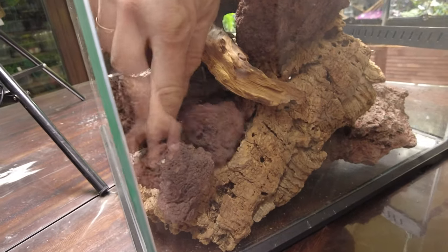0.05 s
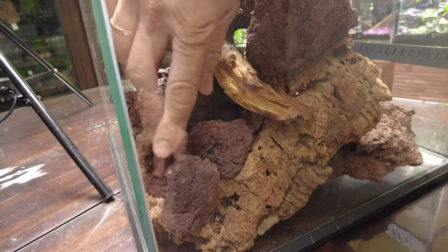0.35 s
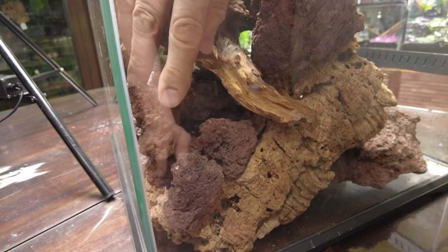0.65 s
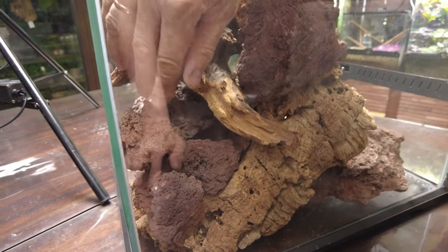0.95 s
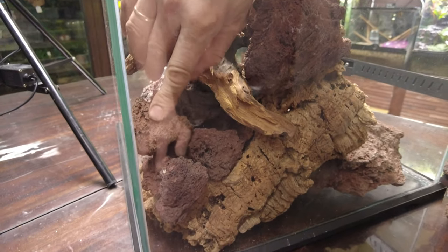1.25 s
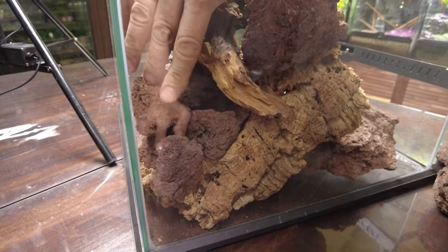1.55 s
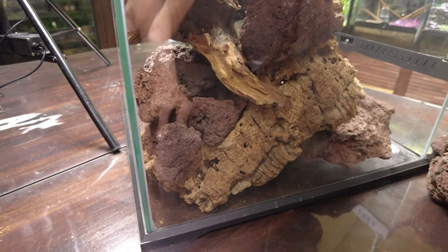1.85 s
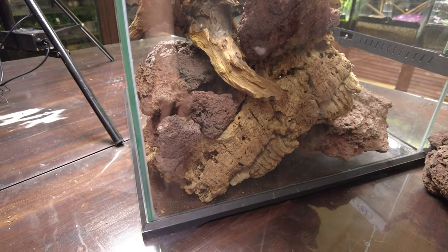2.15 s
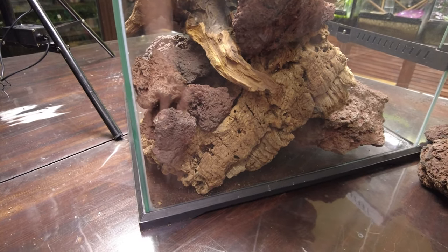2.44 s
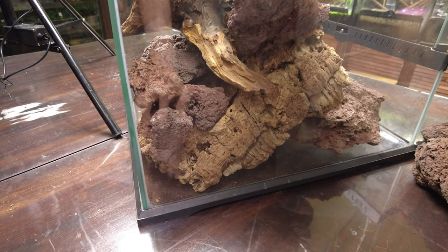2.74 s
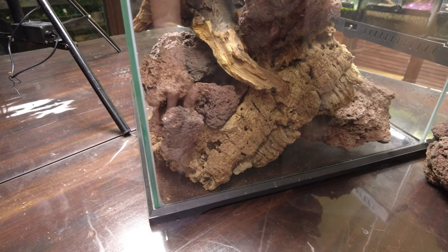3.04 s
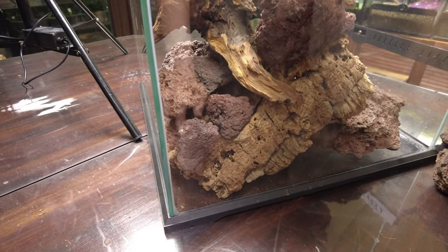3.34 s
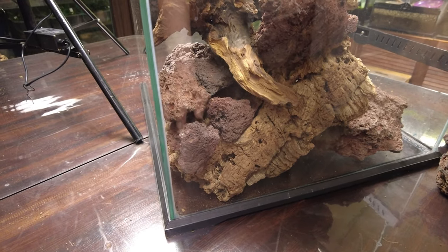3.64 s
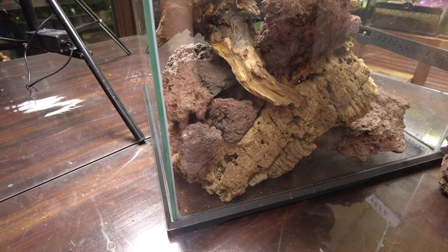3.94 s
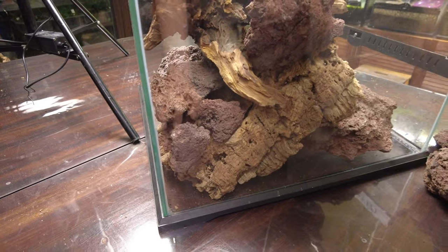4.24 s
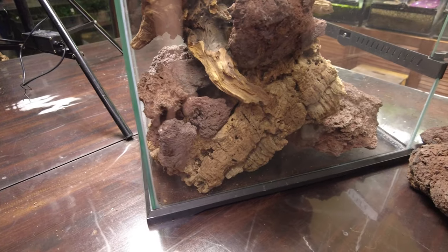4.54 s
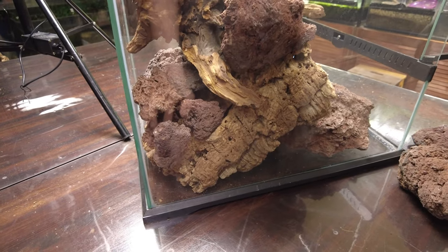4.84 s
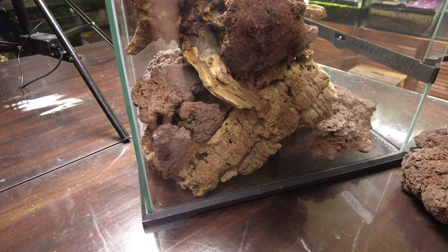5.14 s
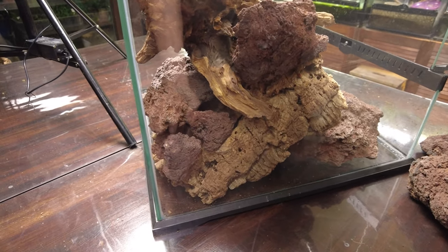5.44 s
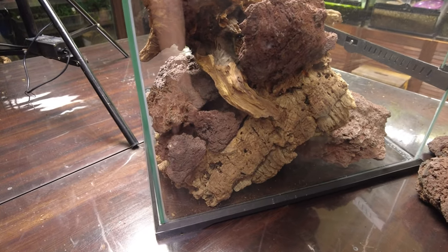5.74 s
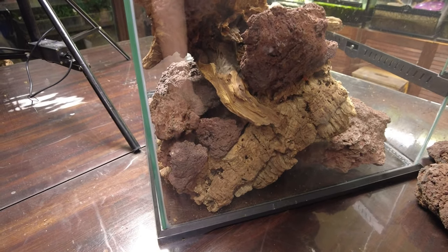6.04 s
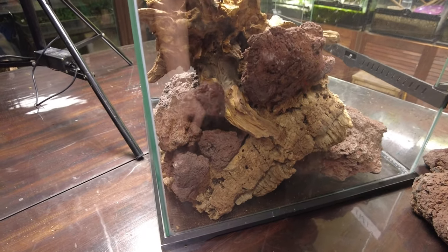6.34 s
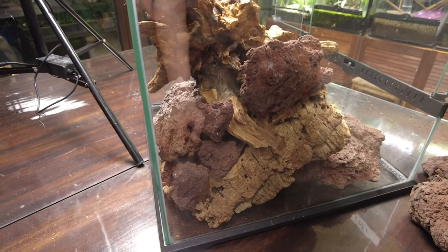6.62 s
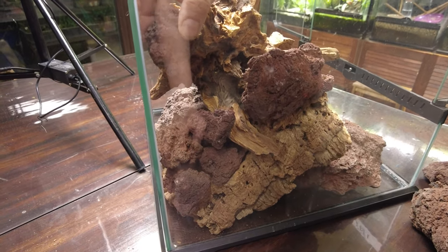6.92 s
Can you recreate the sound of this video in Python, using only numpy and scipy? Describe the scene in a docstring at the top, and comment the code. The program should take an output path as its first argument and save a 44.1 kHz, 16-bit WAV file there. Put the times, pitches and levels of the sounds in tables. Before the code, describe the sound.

Close knocks of porous stone ring a glass tank, followed by a catching scrape of bark, ticking crumbs and a short rock clatter.

```python
"""A small room, close to a glass tank in which a hand wedges lava rocks and cork bark.
Rocks knock and drag against each other and ring the panes; skin rubs over their pores.
A slab of bark scrapes and catches its way down, crumbs tick, the pile shifts,
and one rock drops into place with a clatter. A low hum lies under it all."""
import sys
import numpy as np
from scipy import signal
from scipy.fft import rfft, irfft, next_fast_len
from scipy.io import wavfile

SR = 44100
rng = np.random.default_rng(int(sys.argv[2]) if len(sys.argv) > 2 else 0)


def file_out(sig):
    """Save sig as 16-bit WAV at sys.argv[1]."""
    # one column per channel
    cols = np.atleast_2d(sig).T
    # limit, then scale
    lim = np.clip(cols, -1, 1)
    pcm = np.round(lim * 32767).astype(np.int16)
    wavfile.write(sys.argv[1], SR, pcm)


N = 307818
T = np.arange(int(SR * .35)) / SR  # time axis of one ring, in seconds

# Modes of the loaded glass tank. Each row: pitch in Hz, level in dB, t60 in seconds.
TANK_MODES = [(178.5, -16.5, 0.35), (210.6, -6, 0.43), (384.1, -10, 0.34), (450, -4.5, 0.18),
              (513.7, 1, 0.091), (585, -1.5, 0.22), (690.6, 2, 0.21), (762, -2.5, 0.2), (919, -2.5, 0.22),
              (1115, -5.5, 0.19), (1239, -3, 0.16), (1380, -1, 0.11), (1575, -4.5, 0.13), (1660, 3.5, 0.14),
              (1833, -3, 0.13), (1780, -8.5, 0.14), (2160, -14.5, 0.14), (2307, -1, 0.1),
              (2580, -9.5, 0.044), (2560, -16, 0.13), (3089, -8, 0.1)]
# Dense, short ring of the porous rocks and the table. Each row: frequency in Hz, level in dB.
STONE_COLOUR = [(50, -15.5), (85, 6), (125, -9.5), (180, 6.5), (260, -4), (480, 2.5), (820, 1.5),
                (1350, -2), (2000, -6), (2700, -8), (3800, -9), (5000, -25), (8500, -28.5), (12000, -39),
                (16000, -37)]


def knocks():
    """Each blow cracks in the stone, rings the panes and the loose rock, then sets the table booming."""
    # Rock strikes rock or glass. Each row: time in seconds, strength in dB, hardness in Hz,
    # extra thud on the table in dB, share that goes into the panes from 0 to 1.
    blows = [(0.038, -26, 3760, -4, 0.95), (0.067, -30.5, 5000, -0.5, 0.8), (0.1, -34, 6350, 6.5, 1),
             (0.133, -26, 3390, -10, 0.44), (0.224, -43, 1460, 4.5, 0.7), (0.312, -35.5, 1480, -6, 1),
             (0.379, -23.5, 2350, -10, 0.67), (0.482, -41.5, 1600, -8, .6), (0.533, -34.5, 1760, -21, 0.67),
             (0.627, -33, 3160, -17, 0.66), (0.751, -32, 1600, -3, 1), (0.779, -37, 3040, 7, 0.44),
             (0.859, -23.5, 3930, -0.5, .95), (0.899, -25.5, 3800, -1.5, 0.88),
             (1.207, -45.5, 1900, 3, 0.58), (1.476, -30, 1380, -1.5, 0.94), (1.577, -28, 750, -5, .7),
             (1.603, -22.5, 520, -5.5, 0.5), (1.681, -31, 3300, 3, 0.56), (1.805, -41.5, 606, 4, 0.22),
             (1.84, -50, 2840, 5.5, 0.42), (5.632, -49.5, 402, 11.5, 0.19), (5.652, -42.5, 231, 3.5, 0.53),
             (5.85, -49, 250, 6.5, 0.43), (6.035, -29, 242, -3, 0.26), (6.078, -60, 1200, 7, 0.7),
             (6.249, -30.5, 420, 0, 0.8), (6.307, -26, 4000, -5, 0.14), (6.369, -24, 2400, -2, 0.41),
             (6.377, -29, 1800, -3.5, 0.3), (6.385, -26, 4700, -2.5, 0.44), (6.402, -34, 900, 8.5, 0.24),
             (6.473, -30.5, 3660, 3.5, 0.26)]
    # Modes of the loose rock resting on bark. Each row: pitch in Hz, level in dB, t60 in seconds.
    rock_modes = [(176.6, -3.5, 0.22), (305.6, -3, 0.089), (700, -9, 0.031), (886, -1, 0.15),
                  (1120, -25.5, 0.16), (1260.5, 10, 0.079), (1410, -1, .15), (1704, -6.5, .1),
                  (2090, -9, 0.068), (2550, -14, 0.083), (2670, -12, 0.15), (5600, -22, 0.14),
                  (6430, -20.5, .05), (7500, -24, .07), (8100, -11.5, 0.069), (11100, -24, 0.037)]
    # Colour of snapping grit. Each row: frequency in Hz, level in dB.
    grit_colour = [(2000, -0.5), (9000, 1.5), (13000, -3.5), (16000, -3)]
    # Thud, knock, body, clack and grit of a perfectly hard blow, in dB.
    balance_db = [0, -1.5, 2, -3.5, 1.5]
    boom_colour = [(40, -31), (80, 3), (125, -6), (180, 2.5), (300, -14.5), (600, -66.5)]
    out = np.zeros((2, N))
    for s, db, hardness_hz, thud_db, glass in blows:
        stone = burst(STONE_COLOUR, t60=0.066, tail_db=-13, tail_t60=0.22)
        wobble = roughness(len(T), rate=600, spread=1.5, slip_t60=0.0079) * fade(0.55)
        stone = level(stone * np.hypot(1, wobble), -0.66, span=0.036)
        boom = burst(boom_colour, t60=0.13, tail_db=-0.5, tail_t60=0.45) * (1 - fade(0.041))
        panes = glass * undb(4) * ring(TANK_MODES, detune=0.0015)
        loose_rock = (1 - glass) * undb(1) * ring(rock_modes, detune=0.011)
        grit = colour(rng.standard_normal((2, len(T))), grit_colour) * fade(0.028)
        blow = stone + panes + loose_rock + undb(-9.5) * boom + undb(-11.5) * grit
        # Porous points give way one after another; a softer contact crushes for longer.
        crush_s = 0.0064 * (2000 / hardness_hz) ** 0.27
        attack = np.minimum(T / crush_s, 1) ** 1.1
        shares_db = db + np.add(balance_db, [thud_db, 0, 0, 0, 0])
        add(out, s - .002, contact(blow * attack, shares_db, hardness_hz, span=0.022))
    return out


def drags():
    """Rough rock hops over rough rock: a quick train of slips excites the stone and the panes."""
    # Each row: start and end in seconds, strength in dB, hardness in Hz.
    slides = [(0, 0.016, -32.5, 3050), (0.05, 0.109, -30, 2010), (0.141, 0.178, -33.5, 1688),
              (0.344, 0.379, -35.5, 1740), (0.47, 0.518, -39.5, 1506), (0.55, 0.605, -42, 1450),
              (0.633, 0.66, -31, 2440), (0.688, 0.75, -36.5, 1470), (0.725, 0.838, -38, 2270),
              (1.239, 1.377, -52.5, 3000), (1.346, 1.388, -38, 1580), (1.414, 1.495, -45, 1180),
              (1.497, 1.598, -38.5, 1100), (1.582, 1.608, -34, 1900), (1.651, 1.702, -41.5, 2000),
              (6.196, 6.27, -45.5, 300)]
    # Thud, knock, body, clack and grit of a perfectly hard slide, in dB.
    balance_db = [-1, -3, 1, -8.5, 4]
    out = np.zeros((2, N))
    for start, end, db, hardness_hz in slides:
        span = end - start
        size = int(span * SR)
        push = rng.standard_normal(size) * signal.get_window(("tukey", .3), size)
        push *= np.hypot(.5, roughness(size, rate=760, spread=3.0, slip_t60=0.034))
        stone = burst(STONE_COLOUR, t60=0.015, tail_db=-7.5, tail_t60=0.21)
        panes = undb(-8.5) * ring(TANK_MODES, detune=0.0075)
        grind = signal.fftconvolve(stone + panes, push[None], axes=1)
        add(out, start, contact(grind, np.add(balance_db, db), hardness_hz, span))
    return out


def scrape():
    """Bark grates over rock: dense small fractures rasp and hiss while its hollow rumbles along."""
    # How hard the bark is pushed down the pile. Each row: time in seconds, level in dB.
    push_curve = [(2.79, -72), (2.8, -37), (2.84, -16.5), (2.951, -34.5), (3.024, -21.5), (3.17, -30.5),
                  (3.22, -29.5), (3.32, -27.5), (3.432, -31.5), (3.469, -27), (3.524, -20.5), (3.62, -33.5),
                  (3.831, -38), (3.86, -34.5), (3.961, -35.5), (3.999, -26), (4.178, -43), (4.258, -67),
                  (4.278, -41.5), (4.379, -55.5)]
    # Colours of the three layers. Each row: frequency in Hz, level in dB.
    rumble = [(70, -10), (140, -15.5), (205, -3.5), (255, 0), (310, -1.5), (420, -12.5), (590, -6),
              (800, -17), (1000, -17), (1500, -55.5)]
    rasp = [(150, -20.5), (480, -2.5), (750, 7), (1020, -7), (1300, 6.5), (1650, 3), (2000, -0.5),
            (2800, -4), (3500, -8.5), (6000, -26.5)]
    hiss = [(2500, -11), (4500, 3.5), (7500, 1), (11500, -8), (15000, -1), (16500, -13)]
    times, push_db = np.transpose(push_curve)
    push = undb(np.interp(np.arange(N) / SR, times, push_db, left=-120, right=-120))
    fractures = np.hypot(roughness(N, rate=1000, spread=3.7, slip_t60=.02), .5)
    out = 0
    # The heavy slab averages the fractures out; its surface follows every one.
    for layer, db, crunch in ((rumble, -1.5, .5), (rasp, -4, 1), (hiss, -18.5, 1)):
        grating = fractures ** crunch * rng.standard_normal((2, N))
        out = out + level(colour(grating, layer), db)
    return push * out


def catches():
    """Where the bark snags and lets go, it cracks and its hollow thumps."""
    # Each row: time in seconds, thump in dB, crack in dB.
    snags = [(2.817, -24, -29.5), (2.833, -31, -20.5), (2.894, -22, -23.5), (2.977, -28, -28),
             (2.988, -25, -50), (3.018, -18.5, -25), (3.053, -15.5, -27.5), (3.205, -34, -19.5),
             (3.246, -31.5, -35), (3.264, -22, -25), (3.311, -26, -28), (3.335, -23, -45.5),
             (3.446, -20, -30), (3.455, -36, -21), (3.489, -27, -24.5), (3.527, -21.5, -27),
             (3.541, -21.5, -34), (3.676, -30.5, -28.5), (3.728, -25.5, -28), (3.84, -25.5, -67),
             (3.86, -29, -32), (3.995, -26, -26), (4.098, -25.5, -39), (4.162, -34, -53),
             (4.274, -31.5, -36)]
    # Resonances of the hollow bark. Each row: pitch in Hz, width in Hz, level in dB.
    resonances = [(253.8, 24.2, -4), (299.7, 32.4, -5.5), (606, 47, -9.5), (746, 66, -38.5)]
    # Colour of a crack. Each row: frequency in Hz, level in dB.
    crack_colour = [(500, 1.5), (1000, -11.5), (1500, 8), (2700, -5.5), (4500, -17), (11000, -30),
                    (16000, -21)]
    hollow_modes = [(hz, db, np.log(1000) / (np.pi * width)) for hz, width, db in resonances]
    out = np.zeros((2, N))
    for s, thump_db, crack_db in snags:
        thump = ring(hollow_modes, detune=0.023) * (1 - fade(0.0063))
        crack = burst(crack_colour, t60=0.062, tail_db=-14.5, tail_t60=0.26)
        add(out, s, level(thump, thump_db, span=0.012) + level(crack, crack_db, span=0.0079))
    return out


def scratches():
    """A sharp point of rock chatters in one narrow resonance and dies away."""
    # Each row: time in seconds, pitch in Hz, level in dB.
    chirrs = [(0.73, 2050, -40.5), (1.212, 2340, -51), (1.252, 2310, -52), (1.281, 2360, -54.5),
              (1.685, 2480, -34), (2.227, 3060, -46)]
    attack = np.minimum(T / 0.0068, 1)
    out = np.zeros((2, N))
    for s, hz, db in chirrs:
        peak = [(hz * .7, -30), (hz * .9, -12), (hz, 0), (hz * 1.1, -12), (hz * 1.5, -32), (hz * 3, -50)]
        chirr = burst(peak, t60=0.071, tail_db=-25, tail_t60=0.27) * attack
        add(out, s, level(chirr, db, span=0.034))
    return out


def ticks():
    """Loose crumbs of rock and bark snap and drop on the glass."""
    # Each row: time in seconds, level in dB.
    crumbs = [(4.554, -56), (4.561, -53.5), (4.722, -56), (4.752, -52.5), (4.804, -56.5), (5.003, -53),
              (5.094, -49.5), (5.113, -43.5), (5.135, -45.5), (5.165, -51), (5.63, -52.5), (6.091, -64)]
    # Colour of a crumb. Each row: frequency in Hz, level in dB.
    crumb_colour = [(400, -12.5), (1000, -3), (1700, 6.5), (3000, 0), (5000, -10), (7000, -18),
                    (16000, -12.5)]
    # Its thin ring on the glass. Each row: pitch in Hz, level in dB, t60 in seconds.
    glint_modes = [(7870, 3, 0.25), (9500, -24, 0.071), (11220, 8, 0.13), (13400, -13, 0.057),
                   (15000, -19, .08)]
    out = np.zeros((2, N))
    for s, db in crumbs:
        crackle = burst(crumb_colour, t60=0.067, tail_db=-6, tail_t60=0.14)
        crackle *= roughness(len(T), rate=1200, spread=1.2, slip_t60=0.045)
        glint = undb(-12.5) * ring(glint_modes, detune=.03)
        tick = level(crackle, 0, span=0.021) + glint
        add(out, s, level(tick, db, span=0.0073))
    return out


def rubs():
    """Skin brushes over the rock's pores: a soft rustle that swells and fades with each stroke."""
    # Each row: start and end in seconds, level in dB.
    strokes = [(0.676, 0.861, -55.5), (1.276, 1.416, -56.5), (1.78, 2.52, -61.5), (2.209, 2.279, -49),
               (6.186, 6.288, -60.5)]
    # Colour of the rubbing. Each row: frequency in Hz, level in dB.
    skin_colour = [(100, 16), (250, 13), (600, 6), (1500, 3.5), (4000, -1.5), (8000, -8.5), (12000, -16),
                   (16000, -13)]
    t = np.arange(N) / SR
    swell = sum(undb(db) * np.sin(np.pi * np.clip((t - start) / (end - start), 0, 1))
                for start, end, db in strokes)
    pores = np.hypot(1, roughness(N, rate=1300, spread=1.8, slip_t60=.015))
    return swell * level(colour(pores * rng.standard_normal((2, N)), skin_colour), 0)


def background():
    """Mains and a distant motor hum over room rumble and faint hiss."""
    # Tones of the hum. Each row: pitch in Hz, level in dB.
    tones = [(49.2, -53), (100, -62), (200, -69.5)]
    # Colour of the room tone. Each row: frequency in Hz, level in dB.
    room_colour = [(20, -1), (45, 7), (80, -2.5), (125, -10), (160, -6.5), (250, -8.5), (320, -17),
                   (600, -20.5), (1100, -25.5), (1600, -24), (3000, -31.5), (6000, -39), (16000, -50.5)]
    t = np.arange(N) / SR
    hum = sum(level(np.sin(2 * np.pi * (hz * t + rng.random())), db) for hz, db in tones)
    return hum + level(colour(rng.standard_normal((2, N)), room_colour), -54.5)


def contact(x, shares_db, hardness_hz, span):
    """A contact shares its energy between five bands and rolls off above its hardness frequency."""
    # Thud, knock, body, clack and grit. Each row: low and high edge in Hz.
    bands = [(60, 430), (430, 1050), (1050, 2000), (2000, 3400), (4200, 16000)]
    centres = np.sqrt(np.prod(bands, axis=1))
    order = 14 / (10 * np.log10(2))  # 14 dB per octave
    levels_db = shares_db - 10 * np.log10(1 + (centres / hardness_hz) ** order)
    filters = [signal.butter(5, edges, "band", fs=SR, output="sos") for edges in bands]
    return sum(level(signal.sosfilt(sos, x), db, span) for sos, db in zip(filters, levels_db))


def roughness(size, rate, spread, slip_t60):
    """Flickering friction: tiny random slips, about rate a second, a few much stronger than the rest."""
    strength = undb(spread * np.minimum(rng.exponential(size=size), 4))
    slips = (rng.random(size) < rate / SR) * strength ** 2
    energy = signal.lfilter([1], [1, -fade(slip_t60)[1] ** 2], slips)
    return level(np.sqrt(energy), 0)


def burst(curve, t60, tail_db, tail_t60):
    """Dense modes die fast and leave a tail of reflections; rows are two paths to the microphone."""
    noise = level(colour(rng.standard_normal((2, len(T))), curve), 0)
    return noise * np.hypot(fade(t60), undb(tail_db) * fade(tail_t60))


def ring(modes, detune):
    """Decaying sines, shifted a little by the load and weighted anew at each point of contact."""
    hz, db, t60 = np.transpose(modes)
    hz = hz * (1 + detune * rng.standard_normal(len(hz)))
    decay = np.exp(-np.log(1000) * T / t60[:, None])
    partials = undb(db)[:, None] * np.sin(2 * np.pi * hz[:, None] * T) * decay
    shape = (2, len(modes))
    weight = undb(2 * rng.standard_normal(shape)) * rng.choice([-1, 1], shape)
    return level(weight @ partials, 0, span=.03)


def ports(paths, diffuse_hz):
    """Two close mic ports: the side is direct sound a quarter cycle off, reflections above diffuse_hz."""
    # Stereo width. Each row: frequency in Hz, side relative to mid in dB.
    width = [(60, -18), (120, -24.5), (220, -8.5), (400, -5.5), (680, -1), (1050, 3), (1400, -9.5),
             (2300, -1), (4400, 1.5), (8000, -3), (15000, -1)]
    size = next_fast_len(N)
    direct, reflected = rfft(paths, size)
    hz = np.fft.rfftfreq(size, 1 / SR)
    diffuse = hz / (hz + diffuse_hz + 1)
    blend = 1j * np.sqrt(1 - diffuse) * direct + np.sqrt(diffuse) * reflected
    side = irfft(bin_gains(width, size) * blend, size)[:N]
    return np.array([paths[0] + side, paths[0] - side])


def undb(db):
    """Decibels to gain."""
    return 10 ** (np.asarray(db) / 20)


def fade(t60):
    """Exponential decay over the length of one ring."""
    return np.exp(-np.log(1000) * T / t60)


def bin_gains(curve, size):
    """Gain of a (Hz, dB) curve at the bins of a transform."""
    hz, db = np.transpose(curve)
    return undb(np.interp(np.log(np.fft.rfftfreq(size, 1 / SR) + 1), np.log(hz), db))


def colour(x, curve):
    """Equalise a sound with a (Hz, dB) curve."""
    size = next_fast_len(x.shape[-1])
    return irfft(rfft(x, size) * bin_gains(curve, size), size)[..., :x.shape[-1]]


def level(x, db, span=None):
    """Set the rms of each row, taken over all of it or its first span seconds."""
    head = x if span is None else x[..., :int(span * SR)]
    return x * undb(db) / np.sqrt(np.mean(head ** 2, axis=-1, keepdims=True) + 1e-20)


def add(out, s, x):
    """Mix a sound in at s seconds."""
    i = max(int(s * SR), 0)
    out[:, i:i + x.shape[1]] += x[:, :N - i]


def scene():
    """Rocks a little to the left, bark and hand with their stereo image mirrored, the room behind."""
    rocks = ports(knocks() + drags() + scratches(), diffuse_hz=1810) * undb([[.4], [-.4]])
    bark = ports(scrape() + catches() + ticks() + rubs(), diffuse_hz=1300)[::-1]
    return rocks + bark + ports(background(), diffuse_hz=200)


def record(dry):
    """A steep low-pass cuts the top above 16 kHz."""
    return signal.sosfilt(signal.ellip(10, .2, 80, 16000, fs=SR, output="sos"), dry)


dry = scene()
out = record(dry)
file_out(out)
```